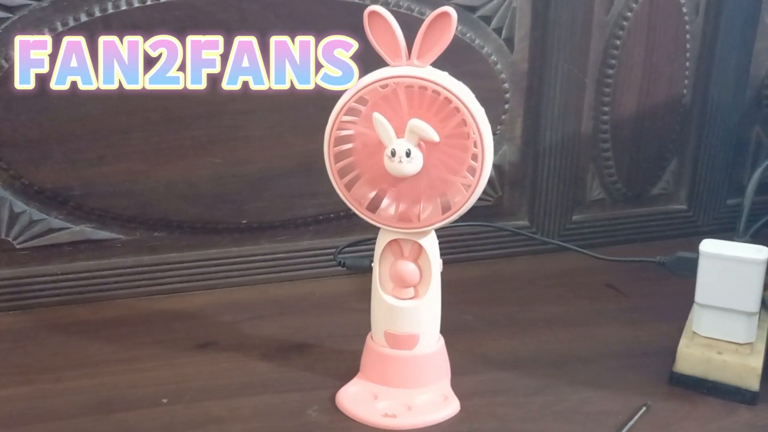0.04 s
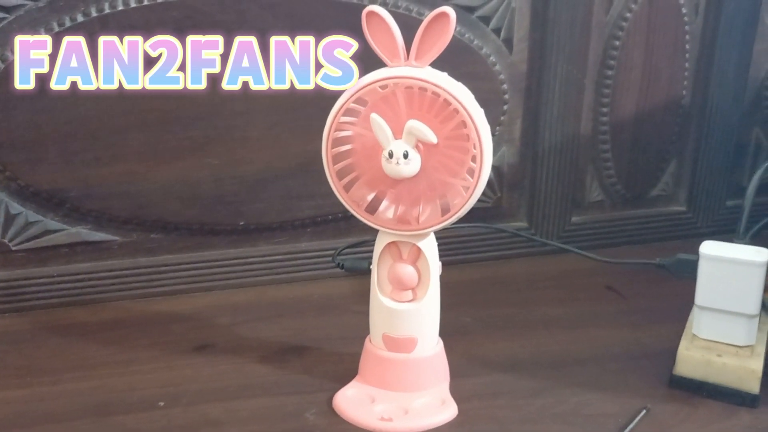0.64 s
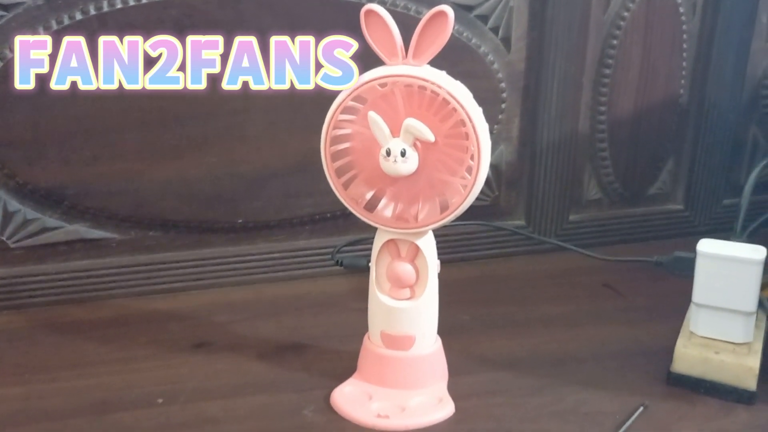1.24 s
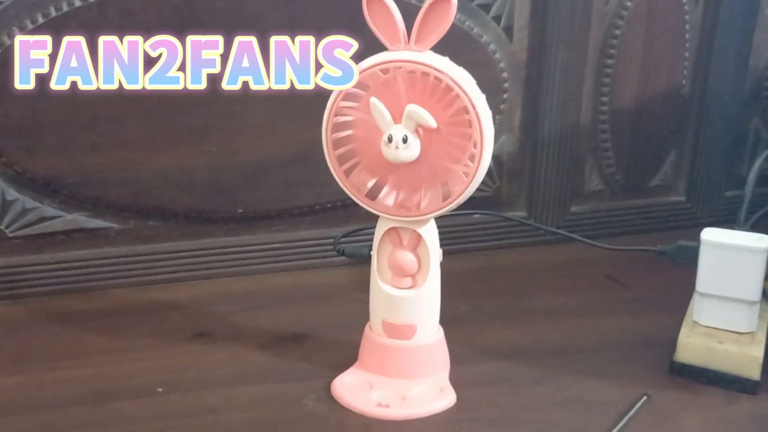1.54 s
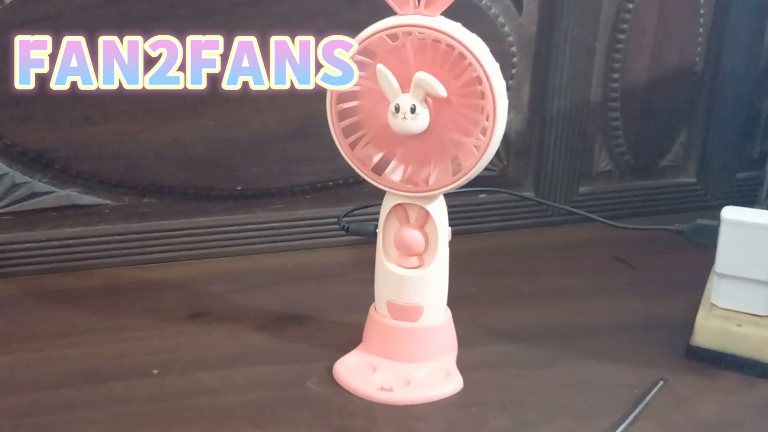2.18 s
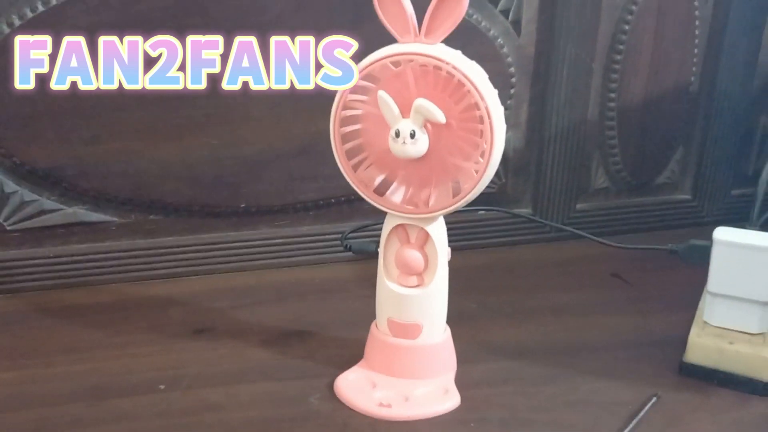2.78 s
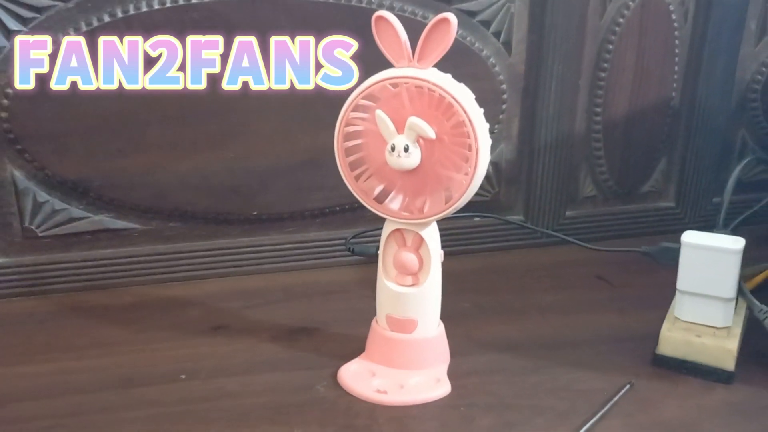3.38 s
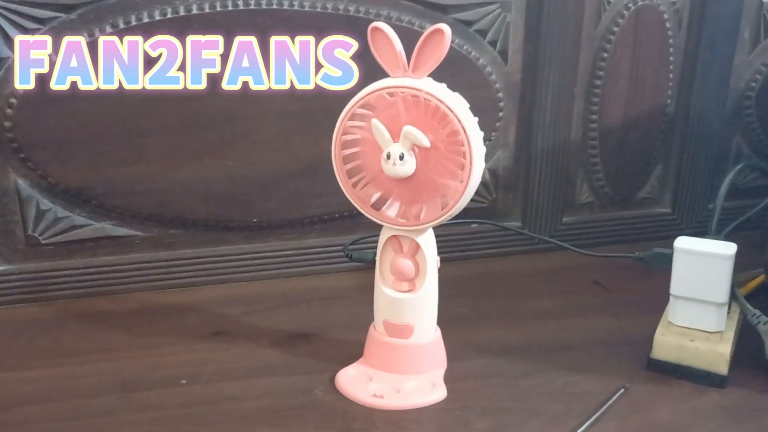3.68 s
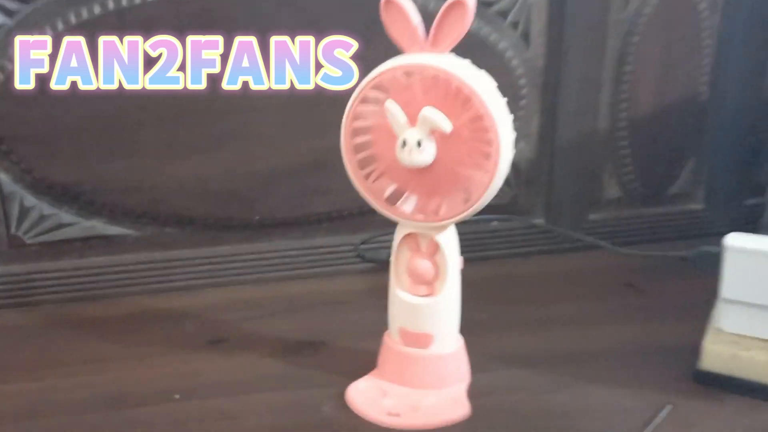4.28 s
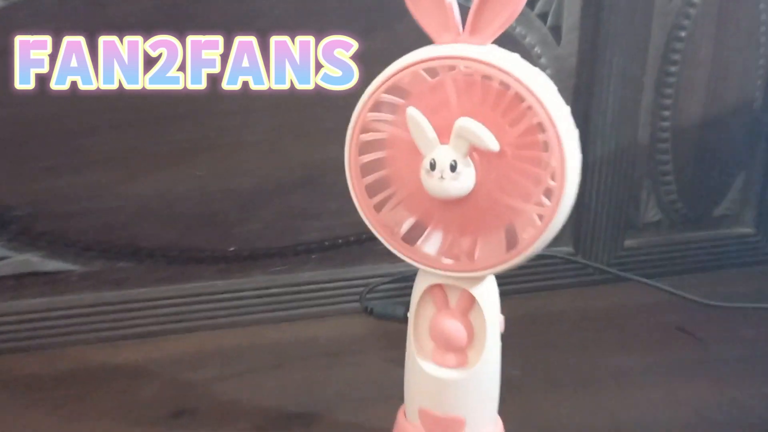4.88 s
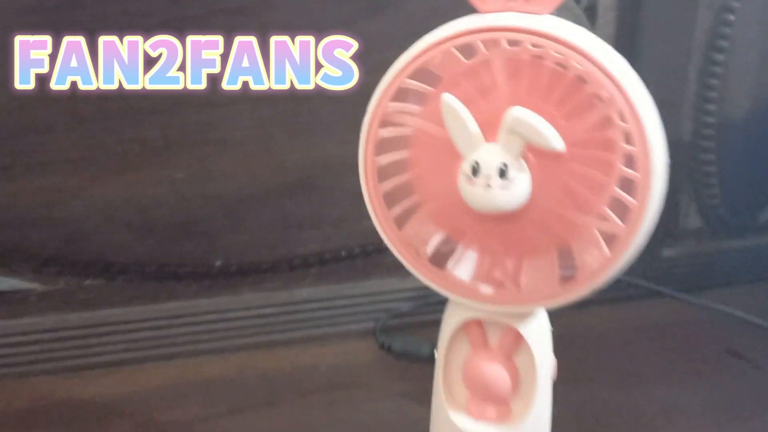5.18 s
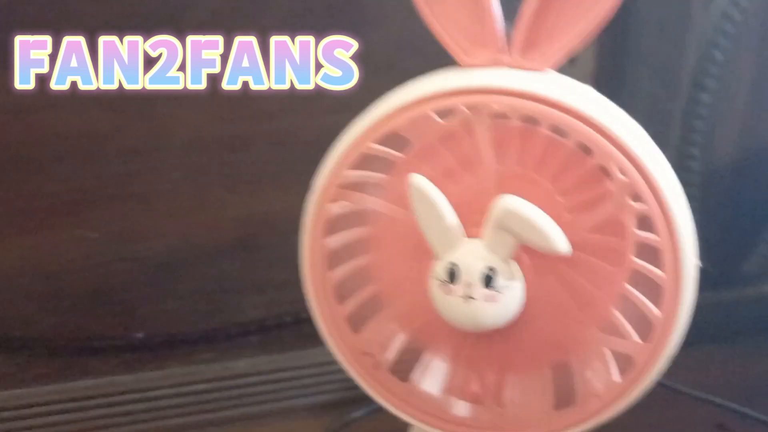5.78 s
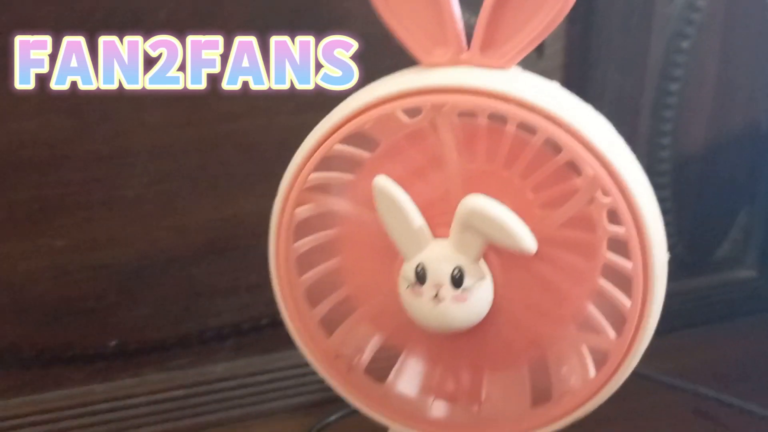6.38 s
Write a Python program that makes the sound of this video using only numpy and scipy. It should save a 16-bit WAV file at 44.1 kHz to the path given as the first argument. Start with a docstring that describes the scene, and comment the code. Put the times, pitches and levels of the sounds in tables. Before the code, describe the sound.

The steady buzzing hum of a small fan on a table, joined late on by dull microphone bumps and rubbing.

```python
"""On a wooden table, a small battery fan hums. Each turn of its rotor sends out a pressure pulse,
heard as a stack of tones with a buzzy edge. Air rushes through the ringing plastic grille, and
the motor's brushes hiss and whine. A hand-held microphone drifts about, then moves in close,
so the tones swell and fade one by one. The hand rustles on the microphone's case, with a few
dull knocks and one tiny tick."""
import sys
import numpy as np
from scipy import signal
from scipy.fft import rfft, irfft, next_fast_len
from scipy.io import wavfile

SR = 44100
rng = np.random.default_rng(int(sys.argv[2]) if len(sys.argv) > 2 else 0)


def store_wav(level_fs):
    """Save 16-bit WAV to argv[1]."""
    pcm = np.round(np.clip(np.atleast_2d(level_fs), -1, 1) * 32767)
    wavfile.write(sys.argv[1], SR, pcm.T.astype(np.int16))


N = 283563
ECHO_TURNS = .45   # lag of the wall's reflection, in rotor turns
CUTOFF_HZ = 15600

# The rotor's slightly sagging speed. Each row: time in seconds, turns per second.
ROTOR_SPEED = [(0, 97.58), (2.4, 97.45), (3.25, 97.3), (4.3, 97.49), (5.6, 97.27), (6.43, 97.29)]
# The microphone backs off, then moves in. Each row: time in seconds, closeness from 0 to 1.
MIC_CLOSENESS = [(0, 0.24), (2.7, .32), (3.2, 0.02), (3.7, 0), (4.3, .25), (4.85, 0.56), (5.3, 0.88),
                 (6.1, 0.95), (6.43, 0.95)]
# The body of the hum. Each row: order (harmonic number), level from afar in dB, dB gained close up,
# exponent on closeness, dB gained as the microphone shifts, pan in dB (positive is left).
HUM_TONES = [(1, -27, 4.5, 1.17, -0.03, 4.5), (2, -31.5, 4.5, 1.17, 1.9, 1.55),
             (3, -34, 6.5, 0.86, -1.5, 1), (4, -50, 9.5, 0.76, 3.5, 13), (5, -45, 4.5, 2.2, -0.66, 0),
             (6, -44.5, -15, 2.85, 3.5, 4.6), (7, -56.5, 16, 1.38, -0.7, 7.5)]
# Spots where one order is strong or weak.
# Each row: order, centre in seconds, half-length in seconds, gain in dB.
ORDER_SWELLS = [(7, .5, .3, 4.5), (10, 1.6, 0.63, 5), (8, 2.0, .3, 1), (5, 1.92, .15, -3.5),
                (9, 2.2, .8, 1), (6, 2.9, 0.33, 1), (5, 4.15, 0.35, 4.5), (4, 4.3, .25, 2),
                (8, 4.85, 0.45, 8), (5, 5.28, 0.18, 4)]
# Brief dips in the upper tones. Each row: centre in seconds, half-length in seconds, gain in dB.
TONE_DIPS = [(1.63, .06, -2.5), (5.44, 0.056, -12)]
# The weaker buzz above the hum. Each row: order (rounded when played), relative level in dB, pan in dB.
BUZZ_TONES = [(8, 0, 3), (9, 0.5, -5), (10, 0, 6), (11, -2, 5), (11.9, -2.5, -4), (13.1, -15, 8),
              (14.2, -10.5, -13), (15.2, -7, 11), (16.2, -5.5, -3), (17, -18, -14), (18, -7.5, -3),
              (19, -25, 10), (20.1, -33, 1), (21.1, -7, 9.5), (23, -29, 14), (24, -25, 5), (25, -15, -1),
              (30, -8, -8), (36, -16, -11)]
# The swell shared by buzz and rasp. Each row: time in seconds, relative level in dB.
BUZZ_SWELL = [(0, -50.5), (.4, -51), (.9, -48), (1.6, -47.5), (2.1, -47), (3.2, -47.5), (4.15, -51.5),
              (4.7, -49), (6.43, -47.5)]
# Air through the grille. Each row: frequency in Hz, left and right relative levels in dB.
AIR_COLOUR = [(30, -78, -83), (62.5, -70.5, -83), (143, -77.5, -71.5), (228, -65.5, -71), (453, -76, -74.5),
              (477, -66.5, -95), (670, -78, -79), (1000, -83, -87), (1330, -83, -98), (1830, -83.5, -81.5),
              (2400, -86, -82.5), (2670, -81, -83), (3820, -88, -87), (4100, -85.5, -86),
              (5100, -84.5, -91.5)]
# Brushes sliding on the commutator. Each row: frequency in Hz, left and right relative levels in dB.
BRUSH_COLOUR = [(5960, -87.5, -87), (6770, -78.5, -84), (6660, -86.5, -87), (7170, -79.5, -88),
                (7800, -79.5, -102), (8300, -83, -100), (8650, -80.5, -100.5), (9150, -94.5, -105),
                (9500, -87.5, -100), (12100, -95, -92.5), (15600, -97, -97)]
# The motor can's main ring. Each row: time in seconds, level in dB.
CAN_RING_LEVEL = [(0, -51.5), (1.45, -51), (1.7, -53.5), (2.6, -52.5), (3.3, -59), (4.1, -62.5),
                  (4.95, -51), (5.8, -55), (6.25, -51)]
# The thin whine of the commutator's sparks. Each row: frequency in Hz, relative level in dB.
WHINE_COLOUR = [(7000, -74.5), (8200, -77), (9600, -78), (11000, -75), (12200, -75), (13500, -78),
                (15500, -83)]
# The whine's slow rise and fall. Each row: time in seconds, gain in dB.
WHINE_SWELL = [(0, 0), (1.7, .3), (2.1, 1.5), (2.8, 1.3), (3.2, -1.5), (5.0, -1.5), (5.6, 0), (6.43, -0.5)]
# The grille rattles harder. Each row: centre in seconds, half-length in seconds, gain in dB.
GRILLE_RATTLES = [(2.83, .07, 4.5), (4.27, 0.076, 4)]
# The hand slides on the case. Each row: start in seconds, level in dB, fade in dB per second.
HAND_SLIDES = [(4.2, -46, 30), (4.85, -42, 21), (5.365, -26.5, 25.5), (5.72, -37, 10), (6.2, -48, 10)]
# The dull sound of rubbing skin. Each row: frequency in Hz, relative level in dB.
SKIN_COLOUR = [(60, 1.5), (140, 1), (240, -7), (340, -13), (600, -16.5), (900, -27.5), (2000, -35),
               (6000, -71)]
# Fingers knock on the case. Each row: start in seconds, strength in dB.
FINGER_KNOCKS = [(4.227, -31), (4.276, -29), (4.394, -27), (4.888, -32), (5.058, -31), (5.357, -16),
                 (5.399, -25), (5.602, -29), (6.052, -29)]
# The case's thud. Each row: frequency in Hz, relative level in dB, seconds to fade by 60 dB.
CASE_MODES = [(86, -1, .07), (125, 0, .06), (225, -8, .03)]


def hum(angle, close, flutter=0.0066, right_lag_rad=0.087, shift_at_s=1.72, shift_takes_s=.14):
    """One lopsided pressure pulse per turn, a little later on the right; higher orders flutter more."""
    out = 0
    ears = angle - np.array([[0], [right_lag_rad]])
    # early on, the microphone shifts to a new spot
    shifted = np.clip((np.arange(N) / SR - shift_at_s) / shift_takes_s + .5, 0, 1)
    for order, far_db, close_db, exponent, shift_db, pan_db in HUM_TONES:
        level_db = far_db + close_db * close ** exponent + shift_db * shifted + swells_and_dips(order)
        # above the third order the sound comes mostly by way of the wall
        echo_lag = 2 * np.pi * ECHO_TURNS * max(0, order - 3)
        tone = np.sqrt(2) * np.cos(order * ears + np.pi / 3 - echo_lag)
        waver = 1 + flutter * order * drift(23)
        out += pan(pan_db) * from_db(level_db) * waver * tone
    return out


def buzz(angle, contour_db, scatter=0.67, ear_spread_rad=0.74, base_db=-56):
    """Each pulse's sharp edge bounces off table and wall; its orders fade as the microphone drifts."""
    out = 0
    swell_db = contour_db - np.mean(contour_db)
    for order, order_db, pan_db in BUZZ_TONES:
        order = round(order)
        direct = np.exp(1j * ear_spread_rad * rng.choice([-1, 1]) * np.array([[1], [-1]]))
        scattered = np.array([drift(2.06) + 1j * drift(3.0) for ear in range(2)]) / np.sqrt(2)
        phase = order * (angle - 2 * np.pi * ECHO_TURNS)
        tone = rms_one(np.real((direct + scatter * scattered) * np.exp(1j * phase)))
        share = min(1, 12 / order) ** 2   # orders above the twelfth swell less
        level_db = base_db + order_db + share * swell_db + swells_and_dips(order)
        out += pan(pan_db) * from_db(level_db) * tone
    return out


def swells_and_dips(order, full_dip_order=4.1):
    """One order's gain in dB: its own slow swells, plus two brief shared dips; low orders dip less."""
    swells_db = bumps([row[1:] for row in ORDER_SWELLS if row[0] == order])
    return swells_db + min(1, order / full_dip_order) ** 2 * bumps(TONE_DIPS)


def air(close):
    """Turbulence behind the blades, coloured by the grille; louder and further left close up."""
    rush = noise(AIR_COLOUR, alike_hz=950, high_hz=5500)
    return from_db(-44 + 1.7 * close) * pan(.5 + 2.3 * close) * rush


def rasp(angle, close, contour_db, pulsing=0.96):
    """Each turn sheds a puff of eddies; they swell with the buzz and are fainter in front of the hub."""
    eddies = rng.standard_normal((2, N)) + rng.standard_normal(N)
    puffs = (1 + pulsing * np.cos(angle)) * eddies
    return from_db(contour_db - 5.5 - 3 * close) * resonate(puffs, hz=1000, width_hz=330)


def brushes(angle, close, pulsing=0.14, flicker_db=1.45, hiss_db=-50.5):
    """Sliding contact hisses, rings the motor can and presses harder once a turn."""
    pressure = (1 + pulsing * np.cos(angle)) * from_db(flicker_db * drift(46))
    hiss = from_db(hiss_db) * noise(BRUSH_COLOUR, alike_hz=1490, low_hz=5430)
    return pressure * (motor_can(close) + hiss)


def motor_can(close):
    """The brushes keep two modes of the metal can ringing; the upper one comes forward close up."""
    scrape = rng.standard_normal((2, N))
    main = from_db(in_time(CAN_RING_LEVEL)) * pan(11) * resonate(scrape, hz=6150, width_hz=380)
    upper = from_db(-69 + 11.5 * close) * pan(9) * resonate(scrape, hz=8100, width_hz=330)
    return main + upper


def whine(angle, wobble_rad=0.026, flicker_db=1.1, lift_db=2.5):
    """The commutator's fine crackle repeats each turn, making a comb of thin, uneven treble lines."""
    size = 4096   # points in one turn
    hz = np.arange(size // 2 + 1) * np.mean(np.array(ROTOR_SPEED)[:, 1])
    in_band = (hz > WHINE_COLOUR[0][0]) & (hz < CUTOFF_HZ)
    lines = from_db(at_hz(WHINE_COLOUR, hz)) * in_band
    one_turn = irfft(lines * rfft(rng.standard_normal((2, size)))) * np.sqrt(size / 2)
    place = (angle + wobble_rad * drift(3.0)) / (2 * np.pi) % 1 * size
    crackle = np.array([np.interp(place, np.arange(size), ear) for ear in one_turn])
    level_db = lift_db + in_time(WHINE_SWELL) + flicker_db * drift(6.8)
    return from_db(level_db) * pan(5.5) * crackle


def grille(close, chatter_db=2):
    """The loose plastic grille rings in short uneven swells; a higher resonance shows close up."""
    shake = rng.standard_normal((2, N)) + rng.standard_normal(N)
    level_db = -54.5 - 3.5 * close + bumps(GRILLE_RATTLES) + chatter_db * drift(21)
    rattle = from_db(level_db) * pan(-4.5) * resonate(shake, hz=1560, width_hz=170)
    upper = resonate(rng.standard_normal((2, N)), hz=2600, width_hz=600)
    return rattle + from_db(-70 + 10.5 * close) * upper


def hand_rustle(grip_db=-53.5, attack_s=.05, lumpy_db=1.5):
    """Skin rubs unevenly on the case: each slide builds fast and dies away over a faint resting grip."""
    power = from_db(grip_db) ** 2
    for start_s, db, fade_db_per_s in HAND_SLIDES:
        age = np.maximum(np.arange(N) / SR - start_s, 0)
        slide = np.minimum(age / attack_s, 1) * from_db(db - fade_db_per_s * age)
        power = power + slide ** 2
    friction = np.sqrt(power) * from_db(lumpy_db * drift(9.9))
    return friction * noise(SKIN_COLOUR, alike_hz=1200, low_hz=72)


def finger_knocks():
    """Soft fingertips thud on the case; the microphone passes none of the deep rumble."""
    clicks = np.zeros(N)
    for start_s, strength_db in FINGER_KNOCKS:
        clicks[round(start_s * SR)] = from_db(strength_db)
    thuds = sum(from_db(db) * ring(clicks, hz, t60) for hz, db, t60 in CASE_MODES)
    return low_cut(thuds, hz=72, poles=5)


def case_tick(start_s=5.515, decay_s=0.0023):
    """The case gives one tiny dry tick on the right."""
    age = np.arange(N) / SR - start_s
    burst = (age > 0) * np.exp(-np.abs(age) / decay_s) * rng.standard_normal((2, N)) + 1e-18
    return from_db(-37) * pan(-15) * low_cut(burst, hz=4000, poles=1)


def from_db(db):
    """Decibels to gain."""
    return 10 ** (np.asarray(db) / 20)


def rms_one(x):
    """Scale to unit power."""
    return x / np.sqrt(np.mean(x ** 2) + 1e-20)


def in_time(rows):
    """A curve's value at every sample."""
    seconds, values = np.transpose(rows)
    return np.interp(np.arange(N) / SR, seconds, values)


def at_hz(points, hz):
    """Each level column of a spectrum at the given frequencies."""
    knots, *columns = np.transpose(points)
    return np.array([np.interp(np.log(hz + 1e-9), np.log(knots), c) for c in columns])


def bumps(rows):
    """Bell-shaped rises or dips of level, in dB at every sample."""
    t = np.arange(N) / SR
    return sum(db * np.exp(-((t - centre_s) / half_s) ** 2) for centre_s, half_s, db in rows)


def pan(db):
    """Left and right gains that differ by db and average to one; positive leans left."""
    gains = from_db(np.array([[1], [-1]]) * db / 2)
    return gains / gains.mean(axis=0)


def drift(rate_hz):
    """A smooth random wander of spread 1."""
    hop, settle = 200, 1000   # samples per step; steps for the filter to settle
    r = np.exp(-2 * np.pi * hop * rate_hz / SR)
    steps = rng.standard_normal(N // hop + settle + 2)
    slow = signal.lfilter([1], [1, -2 * r, r * r], steps)[settle:]
    return np.interp(np.arange(N) / hop, np.arange(len(slow)), rms_one(slow))


def noise(colour, alike_hz, low_hz=10, high_hz=20000):
    """Coloured stereo noise of rms 1 between two edges; it narrows towards mono below alike_hz."""
    size = next_fast_len(N)
    hz = np.arange(size // 2 + 1) * SR / size + 1
    mid, side = rfft(rng.standard_normal((2, size)))
    alike = 1 / (1 + (hz / alike_hz) ** 2)
    ears = np.sqrt(1 + alike) * mid + np.sqrt(1 - alike) * side * [[1], [-1]]
    edges = 1 / np.sqrt((1 + (low_hz / hz) ** 20) * (1 + (hz / high_hz) ** 20))
    return rms_one(irfft(ears * edges * from_db(at_hz(colour, hz)), size)[:, :N])


def ring(clicks, hz, t60):
    """A unit click sets a sine of height 1 ringing."""
    r = np.exp(-np.log(1000) / (t60 * SR))
    w = 2 * np.pi * hz / SR
    return signal.lfilter([0, np.sin(w)], [1, -2 * r * np.cos(w), r * r], clicks + 1e-18)


def resonate(x, hz, width_hz):
    """Pass a sound twice through one resonance, for steep skirts; rms 1."""
    r = np.exp(-np.pi * width_hz / SR)
    section = [1, 0, -1, 1, -2 * r * np.cos(2 * np.pi * hz / SR), r * r]
    return rms_one(signal.sosfilt([section, section], x))


def low_cut(x, hz, poles):
    """Roll off the lows below hz."""
    return signal.sosfilt(signal.butter(poles, hz, "high", fs=SR, output="sos"), x)


def scene():
    """The rotor's angle drives every tone, closeness sets the balance, and handling lies on top."""
    close = in_time(MIC_CLOSENESS)
    contour_db = in_time(BUZZ_SWELL)
    angle = 2 * np.pi * np.cumsum(in_time(ROTOR_SPEED)) / SR
    tones = hum(angle, close) + buzz(angle, contour_db) + whine(angle)
    motor = brushes(angle, close)
    wind = rasp(angle, close, contour_db) + air(close)
    fan = tones + motor + wind + grille(close)
    handling = pan(1.5) * (hand_rustle() + finger_knocks()) + case_tick()
    return fan + handling


def record(dry):
    """The top end is cut steeply."""
    return signal.sosfilt(signal.ellip(12, .1, 90, CUTOFF_HZ, fs=SR, output="sos"), dry)


dry = scene()
out = record(dry)
store_wav(out)
```